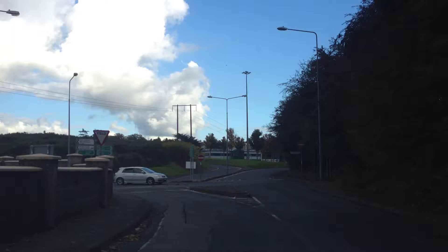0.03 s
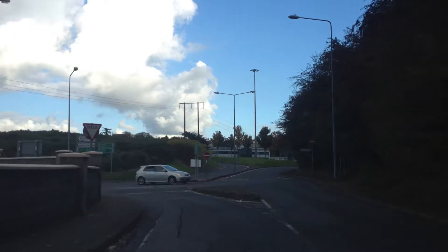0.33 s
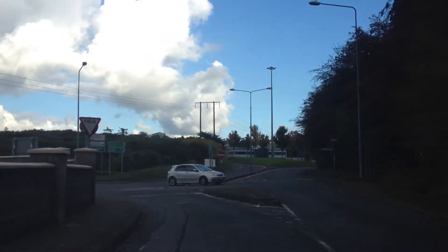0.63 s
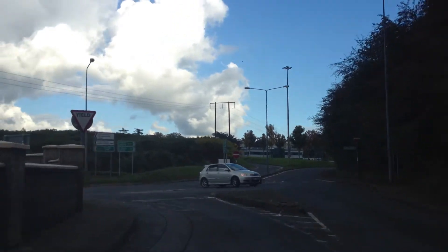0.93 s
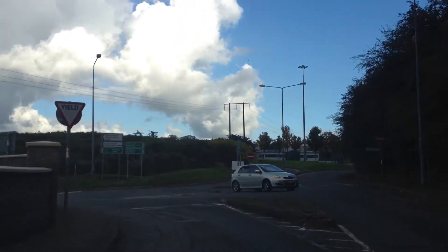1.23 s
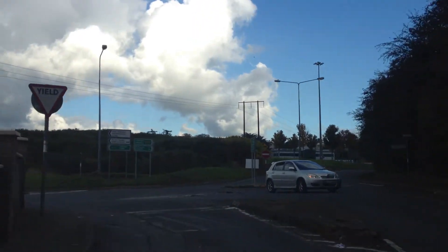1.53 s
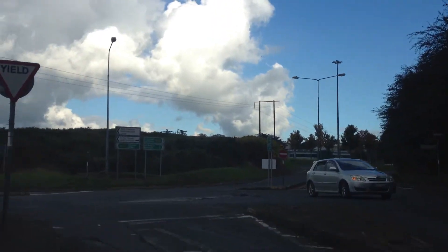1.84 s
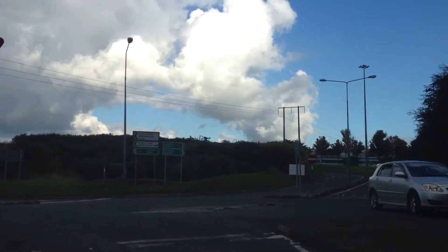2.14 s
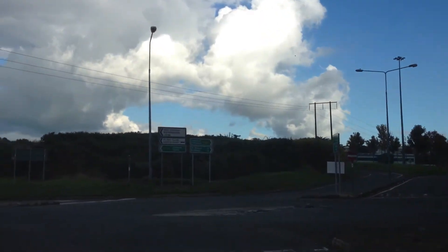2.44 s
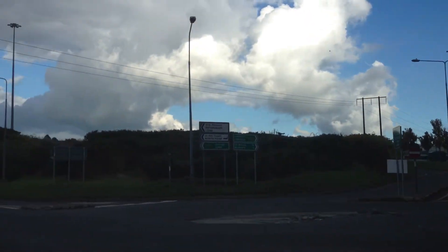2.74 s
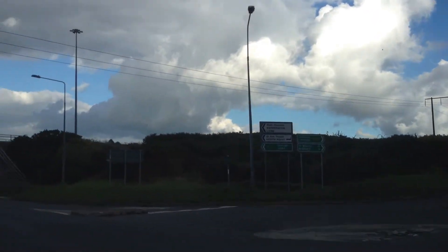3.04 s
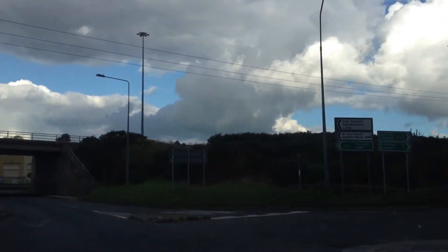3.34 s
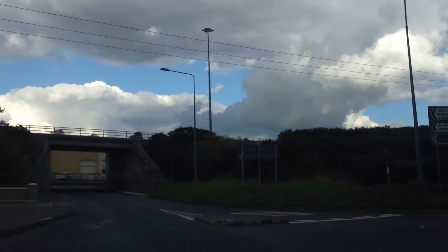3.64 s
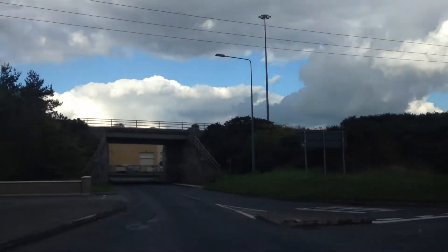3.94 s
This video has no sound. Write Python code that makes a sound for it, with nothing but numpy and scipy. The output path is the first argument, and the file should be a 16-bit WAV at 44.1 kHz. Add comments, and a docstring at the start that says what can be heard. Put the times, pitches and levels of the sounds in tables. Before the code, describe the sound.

A car engine drones low over tyre rumble and hiss, heard from inside the cabin. Loose trim ticks and the wheels thump as the car eases off at a junction, then the engine surges and pulls away.

```python
"""Inside a four-cylinder car that rolls up to a junction, eases off and pulls away with a surging drivetrain.
The engine's firing makes the cabin boom at twice the firing rate, over tyre rumble and airy hiss.
The wheels thump over uneven road, a panel knocks, and loose trim ticks, clinks and clacks.
A cabin resonance whines faintly, and a rasp comes in as the car pulls away."""
import sys
import numpy as np
from scipy import signal
from scipy.fft import rfft, irfft
from scipy.io import wavfile

SR = 44100
rng = np.random.default_rng(int(sys.argv[2]) if len(sys.argv) > 2 else 0)


def dump_mix(stems):
    """Bounce the given channels to the path in sys.argv[1] as a 16-bit WAV at rate SR."""
    frames = np.atleast_2d(stems).T  # one column per channel
    limited = np.clip(frames, -1, 1)  # hard clip at full scale
    pcm = np.round(limited * 32767).astype(np.int16)
    wavfile.write(sys.argv[1], SR, pcm)


N = 176400
TRIM_RISE_S = 0.0011  # attack of ticks, clinks and clacks


def from_db(db):
    """Decibels to gain."""
    return 10 ** (np.asarray(db) / 20)


def rms_one(x):
    """Scale to unit rms."""
    return x / np.sqrt(np.mean(x ** 2) + 1e-20)


def in_time(rows):
    """An automation curve: straight lines between (seconds, value) rows."""
    return np.interp(np.arange(N) / SR, *np.transpose(rows))


def drift(rate_hz):
    """Smooth random wander of unit rms, drawn once every 40 samples."""
    pole = np.exp(-2 * np.pi * rate_hz * 40 / SR)
    white = rng.standard_normal(N // 40 + 2002)
    slow = signal.lfilter([1], [1, -2 * pole, pole * pole], white)[2000:]  # let the filter settle
    return np.interp(np.arange(N) / 40, np.arange(len(slow)), rms_one(slow))


def noise(colour):
    """Noise of unit rms, shaped by (Hz, dB) rows and rolling off above the last one."""
    hz, db = np.transpose(colour)
    freqs = np.maximum(np.arange(N // 2 + 1) * SR / N, 1)
    gain = from_db(np.interp(np.log(freqs), np.log(hz), db)) / np.maximum(freqs / hz[-1], 1) ** 2
    return rms_one(irfft(rfft(rng.standard_normal(N)) * gain, N))


def bursts(rows, rise_s, hold_s, t60_s):
    """Envelope of (seconds, dB) hits: a quick attack, a short hold, then a decay."""
    t = np.arange(N) / SR
    envelope = 0
    for start, db in rows:
        attack = np.clip((t - start) / rise_s, 0, 1)
        decay_db = 60 * np.maximum(t - start - hold_s, 0) / t60_s
        envelope = envelope + attack * from_db(db - decay_db)
    return envelope


def engine_order(crank, order, waver_db, waver_rad):
    """A wavering tone at a multiple of the crank rate; orders above 8 start at a random phase."""
    cabin_lag_rad, waver_hz = 0.78, 6.1
    offset = rng.uniform(0, 2 * np.pi) * (order > 8) - cabin_lag_rad
    phase = order * crank + offset + waver_rad * drift(waver_hz)
    return np.sqrt(2) * np.cos(phase) * from_db(waver_db * drift(waver_hz))


def engine(crank):
    """Three strong firing harmonics fill the cabin; weaker crank orders make them throb."""
    # Fader rides for the engine's tones. Each row: time in seconds, relative level in dB.
    note_level = [(0.2, -36), (1.62, -34), (1.73, -50), (2.01, -33), (2.05, -45), (2.18, -36.5),
                  (2.68, -33.5), (3.97, -35)]  # the firing note drops out as the throttle closes
    boom_level = [(0.17, -19), (0.46, -15.5), (0.59, -20.5), (1.49, -15.5), (1.68, -22), (1.7, -30.5),
                  (1.78, -18), (1.8, -38), (1.84, -24), (1.87, -45), (1.91, -19), (1.97, -17.5),
                  (2.08, -21), (2.35, -14), (2.45, -23.5), (2.61, -12.5), (2.73, -19), (2.9, -11.5),
                  (2.96, -13.5), (3.57, -12), (3.91, -14.5), (3.99, -18.5)]  # cabin boom at twice the firing rate
    throb_level = [(0.2, -28.5), (0.8, -28.5), (1.45, -42), (1.8, -30), (2.3, -40), (2.5, -44), (4.0, -32)]  # at two and a half times the firing rate
    drone_level = [(0.17, -35), (0.22, -33), (0.41, -31), (1.41, -23), (1.85, -34.5), (2.48, -24.5),
                   (2.56, -37.5), (2.74, -22), (2.85, -34), (3.09, -20), (3.18, -24.5), (3.42, -17.5),
                   (3.49, -37.5), (3.54, -16.5), (3.58, -26.5), (3.97, -20.5)]  # at three times the firing rate
    overtone_level = [(0.2, -35.5), (1.3, -34), (1.5, -29.5), (1.7, -34), (2.3, -35), (2.9, -34.5),
                      (3.15, -30), (3.45, -29), (3.7, -33), (4.0, -30)]  # the weaker orders grow with load
    # The weaker orders. Each row: multiple of the crank rate, level in dB against their fader.
    weak_orders = [(3, -14), (7, -9), (8, -8), (9, -17.5), (10, -9.5), (11, -24), (12, -15.5), (13, -16.5),
                   (14, -17.5), (17, -24), (18, -20), (20, -23), (22, -19.5), (24, -20.5), (26, -26),
                   (30, -20.5)]
    note = from_db(in_time(note_level) - 1.9) * engine_order(crank, 2, waver_db=1.5, waver_rad=0.05)
    boom = from_db(in_time(boom_level) + 0.03) * engine_order(crank, 4, waver_db=0.16, waver_rad=0.02)
    throb = from_db(in_time(throb_level) - 1.5) * engine_order(crank, 5, waver_db=3.5, waver_rad=0.27)
    drone = from_db(in_time(drone_level) - 0.5) * engine_order(crank, 6, waver_db=1.37, waver_rad=0.23)
    overtones = sum(from_db(db) * engine_order(crank, order, waver_db=3, waver_rad=0.22)
                    for order, db in weak_orders)
    return note + boom + throb + drone + from_db(in_time(overtone_level)) * overtones


def road_rumble(crank):
    """The car body rumbles low under the tyre roar, which pulses a little with each crank turn."""
    # Tone of the body and of the tyres. Each row: frequency in Hz, relative level in dB.
    body_colour = [(20, -29), (40, -17), (60, -13), (82, -18), (102, 5), (130, 2.5), (170, 6), (240, 2.5),
                   (290, -1.5), (350, -20.5), (600, -31.5)]
    tyre_colour = [(200, -36), (290, 10), (400, 5.5), (520, 2), (680, 3), (760, -2.5), (840, 1), (960, -2),
                   (1100, -4.5), (1300, -5), (1550, -17), (2500, -37)]
    # Swell of the tyre roar. Each row: time in seconds, relative level in dB.
    tyre_level = [(0.3, -31), (1.29, -31.5), (2.25, -31.5), (2.92, -29), (3.09, -26.5), (3.26, -27.5),
                  (3.64, -28.5), (4.0, -30.5)]
    body = from_db(-28 + 1.1 * drift(rate_hz=7.2)) * noise(body_colour)
    tyres = from_db(in_time(tyre_level) - 3 + drift(rate_hz=30)) * noise(tyre_colour)
    return body + tyres * (1 + 0.12 * np.sin(crank))


def suspension_thumps():
    """Uneven road sends deep, soft-edged thumps up through the suspension."""
    # The bumps. Each row: start in seconds, level in dB.
    hits = [(0.135, -20), (1.758, -16), (2.005, -20.5)]
    # Their bass-heavy tone. Each row: frequency in Hz, relative level in dB.
    colour = [(25, -42), (60, -11), (100, 12), (170, 17), (250, -14.5), (400, -7.5), (1000, -60.5)]
    return noise(colour) * bursts(hits, rise_s=0.015, hold_s=0.034, t60_s=0.21)


def panel_knocks():
    """A panel gives short, hollow knocks."""
    # The knocks. Each row: start in seconds, level in dB.
    hits = [(0.158, -29.5), (1.256, -26), (1.937, -22.5), (2.355, -29.5)]
    # The panel's boxy tone. Each row: frequency in Hz, relative level in dB.
    colour = [(200, -5), (500, 1.5), (950, 4.5), (1200, -5.5), (1500, -12), (2200, -19), (6000, -28),
              (10000, -40)]
    return noise(colour) * bursts(hits, rise_s=0.0014, hold_s=0.005, t60_s=0.04)


def loose_part_clacks():
    """Two loose parts clack: a brief chatter rings two resonances in each."""
    # The clacks. Each row: start in seconds, level of the ring in dB, low and high resonance in Hz.
    hits = [(2.189, -31, 2030, 4250), (2.355, -31, 1510, 3250)]
    # Tone of the chatter. Each row: frequency in Hz, relative level in dB.
    chatter_colour = [(700, -20), (1400, 4.5), (3000, 3.5), (6500, 0), (9000, -8), (15000, -28)]
    ring_width_hz, chatter_db = 250, -4.5
    out = 0
    for start, db, low_hz, high_hz in hits:
        chatter = noise(chatter_colour)
        rings = sum(signal.lfilter(*signal.iirpeak(hz, hz / ring_width_hz, fs=SR), chatter)
                    for hz in (low_hz, high_hz))
        envelope = bursts([(start, db)], TRIM_RISE_S, hold_s=0.0028, t60_s=0.054)
        out = out + (rms_one(rings) + from_db(chatter_db) * chatter) * envelope
    return out


def trim_ticks():
    """Loose plastic trim chatters in dry ticks, each with its own brightness."""
    # The ticks. Each row: start in seconds, then the levels of mids, treble and top in dB.
    hits = [(0.157, -40, -40.5, -48), (0.252, -50, -43, -52), (0.717, -33.5, -31, -42),
            (1.231, -50, -43.5, -54), (1.404, -48, -44, -52), (1.482, -45, -36, -51),
            (1.567, -54, -40, -56), (1.718, -44, -42.5, -51), (1.901, -47, -45, -54),
            (1.983, -48, -45, -54), (2.027, -45, -43, -43), (2.071, -46, -38, -50)]
    # The mid, treble and top bands. Each row: low edge in Hz, high edge in Hz.
    bands = [(1400, 2470), (4000, 7440), (9000, 20000)]
    starts, *band_levels = np.transpose(hits)
    out = 0
    for edges, levels in zip(bands, band_levels):
        bandpass = signal.butter(2, edges, "band", fs=SR, output="sos")
        band = rms_one(signal.sosfilt(bandpass, rng.standard_normal(N)))
        out = out + band * bursts(zip(starts, levels), TRIM_RISE_S, hold_s=0.004, t60_s=0.045)
    return out


def small_part_clinks():
    """One small hard part clinks lightly, with the same bright tone each time."""
    # The clinks. Each row: start in seconds, level in dB.
    hits = [(0.224, -37), (1.064, -41), (1.503, -40), (2.079, -36.5), (2.291, -39.5)]
    # The part's tone. Each row: frequency in Hz, relative level in dB.
    colour = [(3500, -14), (5200, -10), (5850, -2), (6500, -10), (8000, -9.5), (10000, -31), (13000, -20),
              (16000, -35)]
    return noise(colour) * bursts(hits, TRIM_RISE_S, hold_s=0.0024, t60_s=0.049)


def cabin_whine():
    """A narrow resonance of the cabin sings near 850 Hz with a slight flutter."""
    # Swell of the whine. Each row: time in seconds, relative level in dB.
    level = [(0.15, -43), (0.27, -32), (0.5, -41.5), (0.8, -34.5), (1.2, -41), (2.6, -41.5), (3.3, -39),
             (4.0, -44)]
    # The resonant peak. Each row: frequency in Hz, relative level in dB.
    colour = [(720, -23), (810, -4), (850, 6.5), (910, -2), (965, -20), (1100, -41)]
    return from_db(in_time(level) - 4.5 + 0.5 * drift(rate_hz=9)) * noise(colour)


def road_hiss(crank):
    """Airy road hiss flickers and pulses faintly with each firing."""
    # Fader rides for the hiss and its top octave. Each row: time in seconds, relative level in dB.
    hiss_level = [(0.3, -44), (1.0, -44), (1.8, -43), (2.5, -44.5), (2.64, -40.5), (3.0, -39.5),
                  (3.28, -38), (3.45, -41.5), (3.58, -39), (4.0, -39)]
    air_level = [(0.3, -62), (1.2, -59.5), (2.5, -59.5), (2.9, -54), (3.15, -53), (3.35, -52.5),
                 (3.45, -59), (3.58, -53.5), (4.0, -53.5)]
    # Tone of the same two layers. Each row: frequency in Hz, relative level in dB.
    hiss_colour = [(1000, -18), (1500, 2), (2200, 1), (2700, -0.5), (3400, -1.5), (4300, -2.5), (4950, -1),
                   (5600, -5), (6400, -5), (7400, -1), (8300, -5.5), (9200, -14), (11000, -50)]
    air_colour = [(8000, -13), (9400, -3.5), (10800, -4.5), (13000, -1.5), (15200, -5.5), (18000, -10.5)]
    hiss = from_db(in_time(hiss_level) - 1) * noise(hiss_colour)
    air = from_db(in_time(air_level) + 0.5) * noise(air_colour)
    flicker = from_db(0.4 * drift(rate_hz=30))
    return (hiss + air) * flicker * (1 + 0.071 * np.sin(2 * crank))


def pull_away_rasp():
    """A thin rasp of upper-mid noise comes in as the car pulls away."""
    # Swell of the rasp. Each row: time in seconds, level in dB.
    level = [(2.4, -61), (2.7, -52), (3.3, -46), (3.45, -48.5), (3.6, -43.5), (4.0, -56)]
    # Its two-peaked tone. Each row: frequency in Hz, relative level in dB.
    colour = [(1500, -15), (2050, -5.5), (2300, 3), (2750, -11), (3400, 4), (3650, -2), (4000, -4),
              (5500, -22)]
    return from_db(in_time(level)) * noise(colour)


def scene():
    """The cabin mix in mono; the crank turns once for every two firings."""
    # Engine speed, surging on the pull-away. Each row: time in seconds, firings per second.
    firing_rate = [(0.12, 73.7), (0.8, 72.5), (1.38, 72.4), (1.62, 70.8), (1.8, 71.8), (2.01, 70.3),
                   (2.13, 65.9), (2.32, 73.8), (2.44, 63.3), (2.61, 73.3), (2.73, 65.5), (2.87, 72.7),
                   (2.99, 67.5), (3.12, 73.8), (3.23, 69.0), (3.36, 74), (3.47, 71), (3.59, 75.4),
                   (3.69, 71), (3.84, 77), (4.0, 73)]
    crank = np.pi * np.cumsum(in_time(firing_rate)) / SR  # angle in radians
    bed = engine(crank) + road_rumble(crank) + road_hiss(crank) + cabin_whine() + pull_away_rasp()
    rattles = trim_ticks() + loose_part_clacks() + small_part_clinks() + panel_knocks()
    return (bed + rattles + suspension_thumps())[None]


def record(dry):
    """The sound snaps in after a moment of silence; a steep low-pass cuts the very top."""
    start_s, fade_s, cutoff_hz = 0.119, 0.003, 15450
    fade_in = np.clip((np.arange(N) / SR - start_s) / fade_s, 0, 1)
    lowpass = signal.ellip(12, 0.1, 80, cutoff_hz, fs=SR, output="sos")
    return signal.sosfilt(lowpass, dry * fade_in)


dry = scene()
out = record(dry)
dump_mix(out)
```